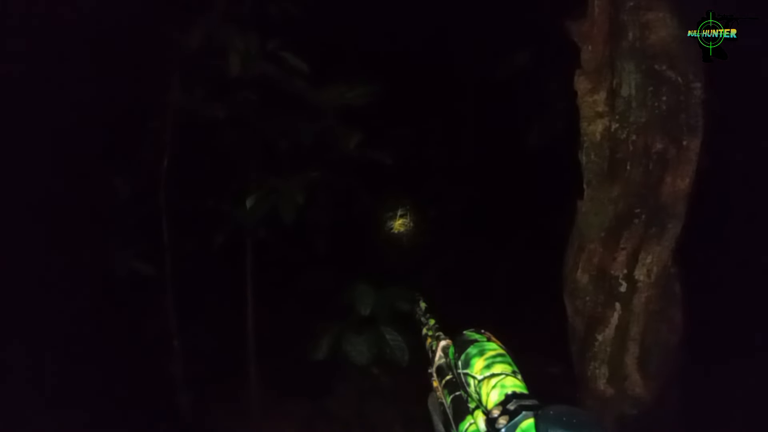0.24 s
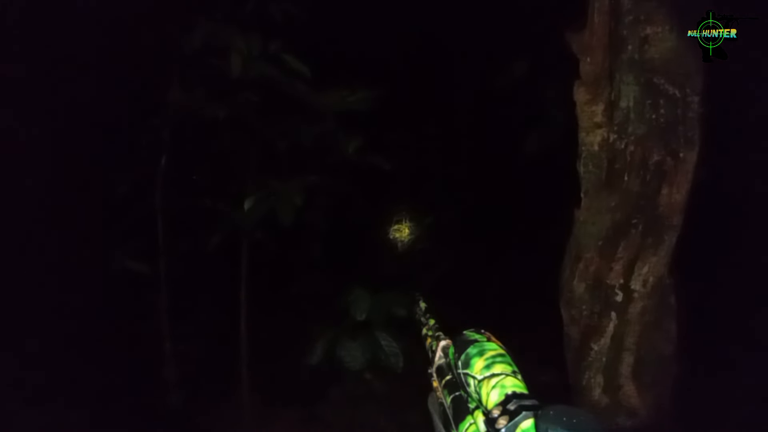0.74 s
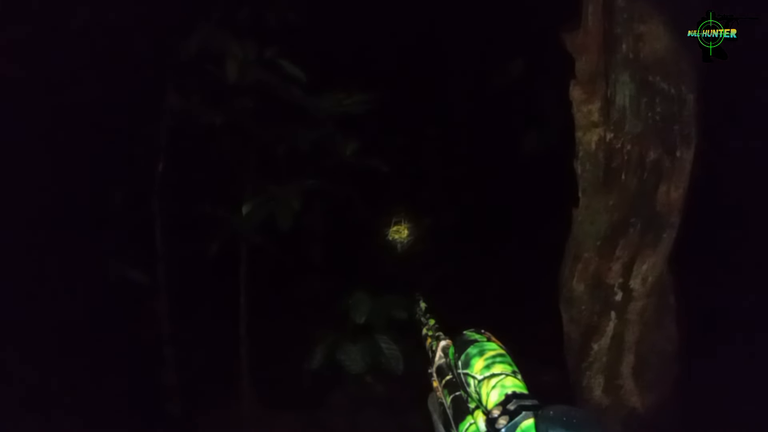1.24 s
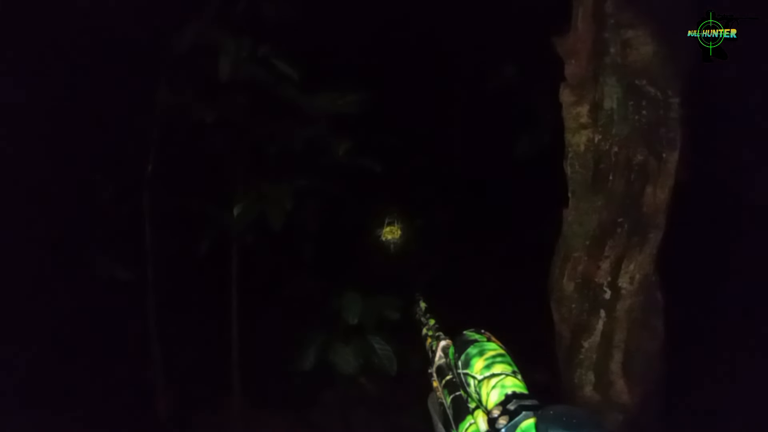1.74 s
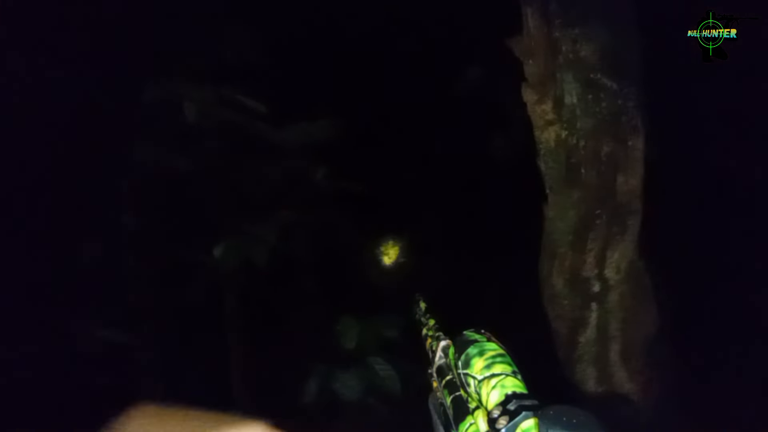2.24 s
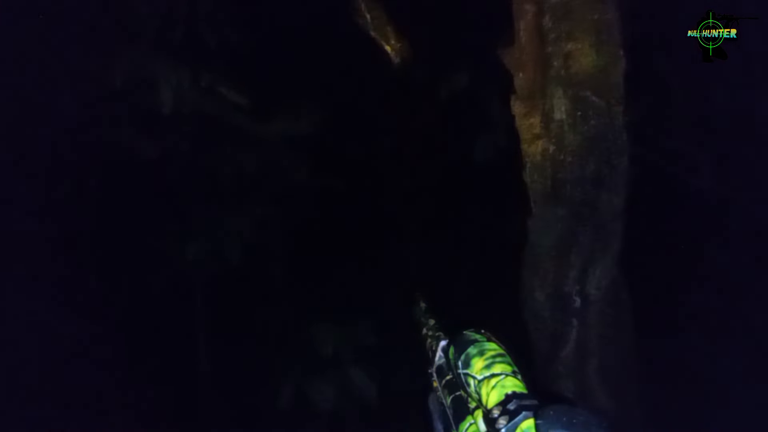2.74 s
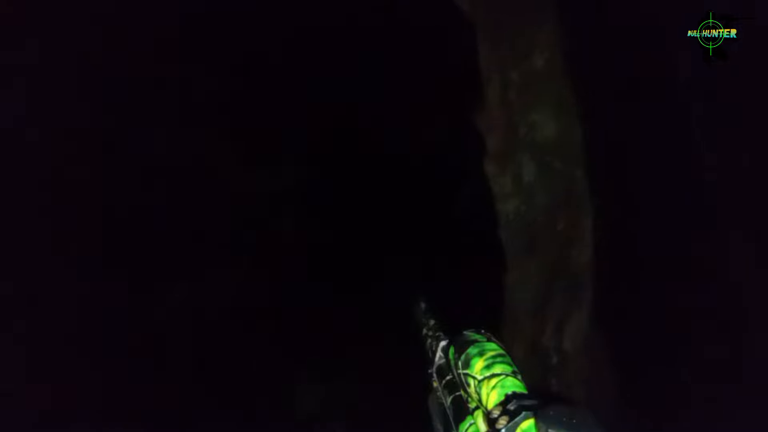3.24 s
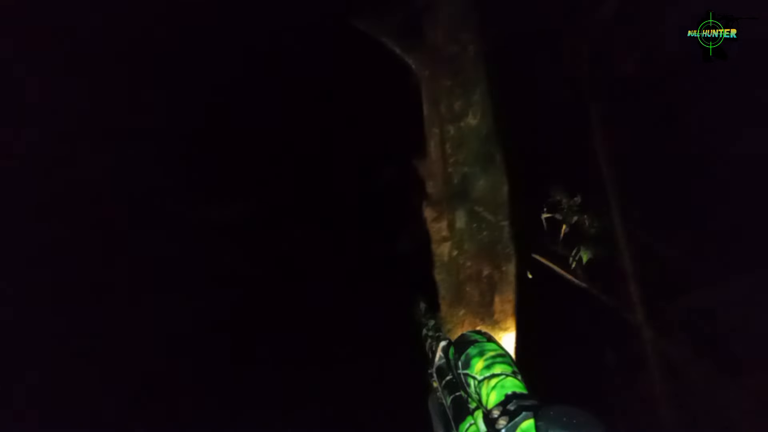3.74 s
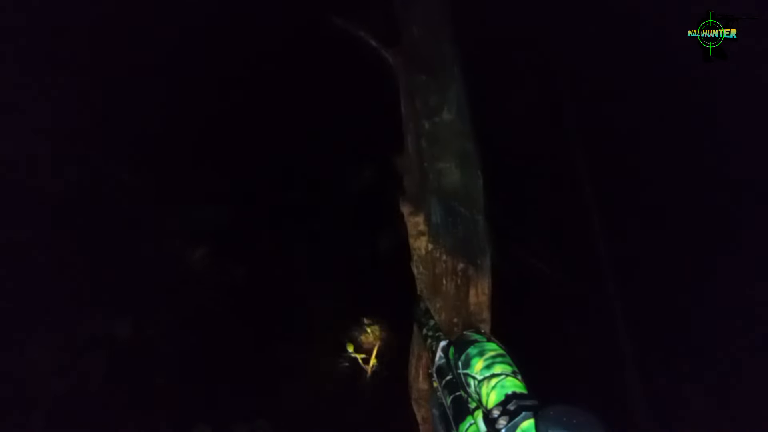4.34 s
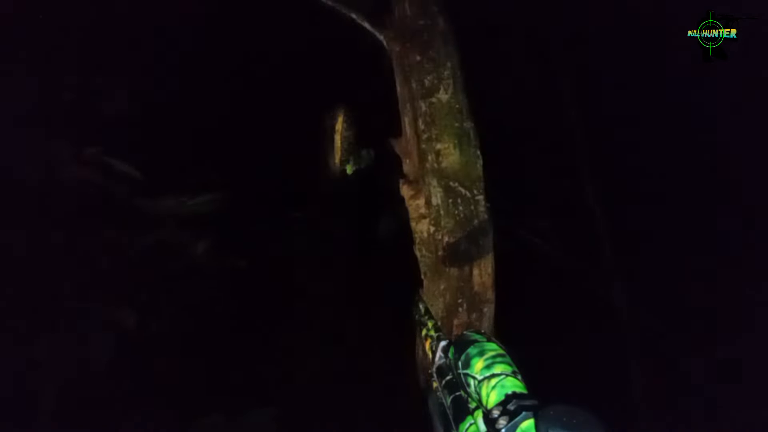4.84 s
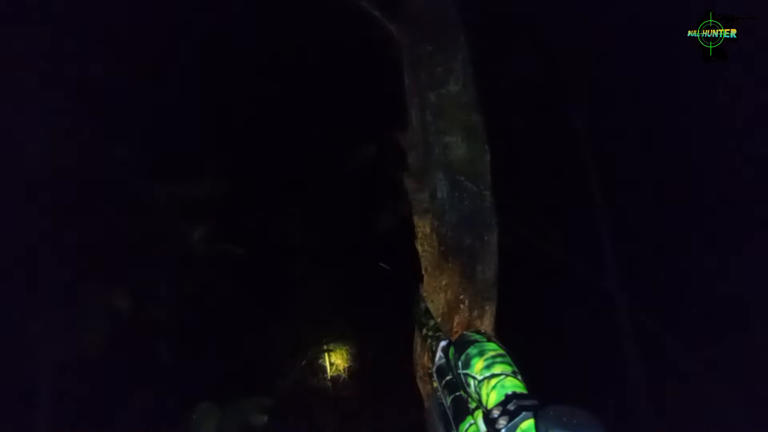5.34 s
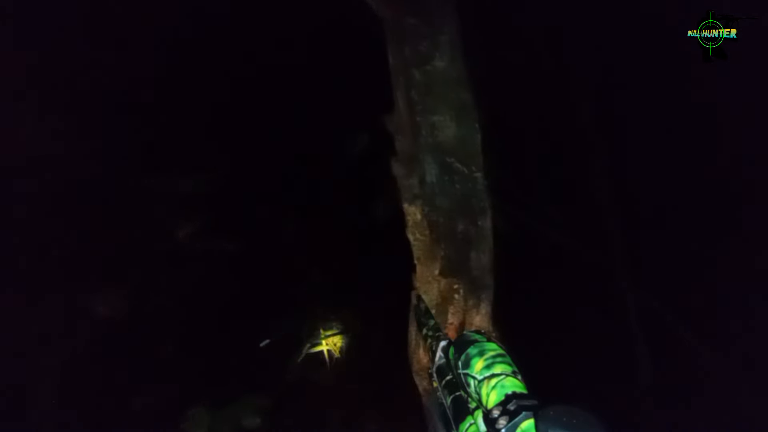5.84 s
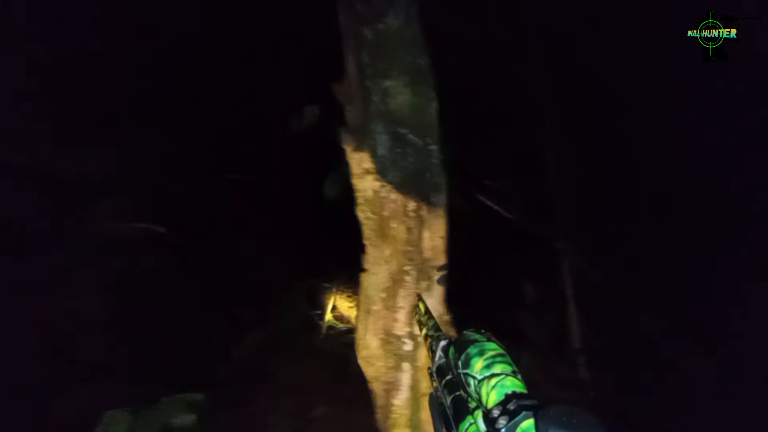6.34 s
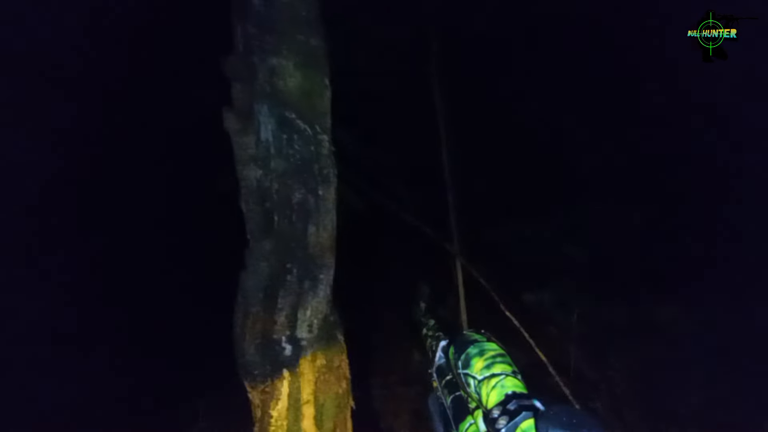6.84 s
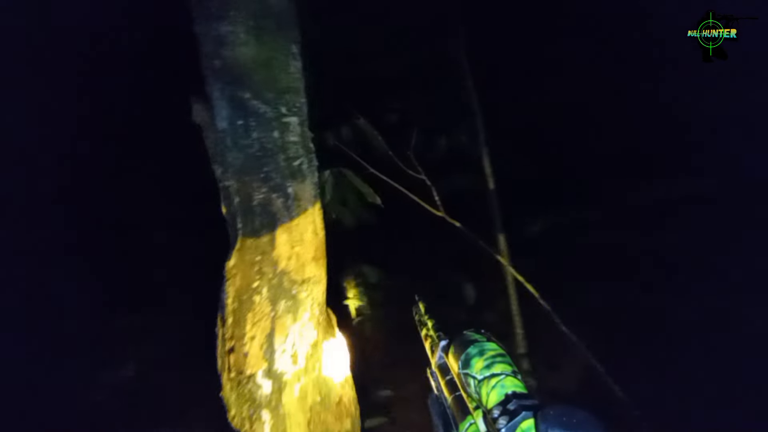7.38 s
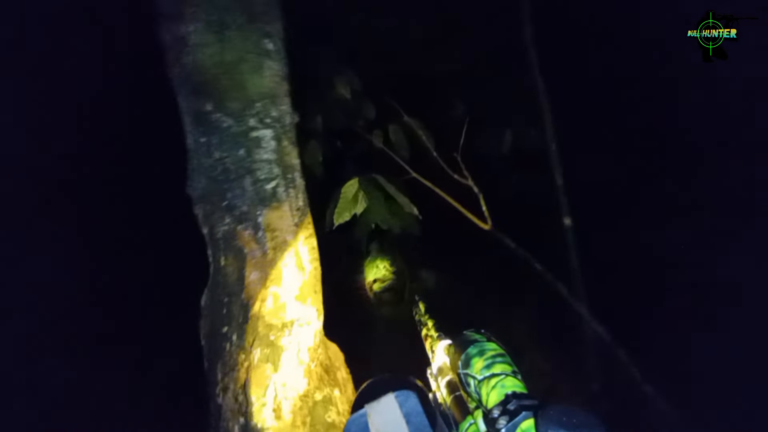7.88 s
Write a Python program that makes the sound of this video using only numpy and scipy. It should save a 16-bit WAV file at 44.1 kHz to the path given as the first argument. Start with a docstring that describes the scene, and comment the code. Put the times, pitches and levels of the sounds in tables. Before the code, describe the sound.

High cricket trills and rasping katydids fill a tropical forest at night while someone nearby creeps over leaf litter, twigs cracking and sharp clicks snapping.

```python
"""Tropical forest at night

Crickets trill at two pitches, a katydid rasps about four times a second above them and a small frog calls
far off: all are wing or voice tones smeared by echoes from the trees. Someone creeps through the leaf litter
with gear in hand: soft knocks, crackling twigs and sharp snaps, made of short noise bursts and dying tones.
Cloth rubs, a low rumble, a brief hum and a faint hush of air are filtered noise.
"""
import sys
import numpy as np
from scipy import signal
from scipy.fft import rfft, irfft
from scipy.io import wavfile
from scipy.ndimage import uniform_filter1d

SR = 44100
rng = np.random.default_rng(int(sys.argv[2]) if len(sys.argv) > 2 else 0)


def int16_out(signal):
    """Quantize to a 16-bit WAV file."""
    q = np.round(np.clip(np.atleast_2d(signal).T, -1, 1) * 32767)
    wavfile.write(sys.argv[1], SR, q.astype(np.int16))


N = 357651
T = np.arange(N) / SR  # time in seconds

# Dry leaves crushed under a slow tread.
# Each row: time of the peak in seconds, half length in seconds, relative level in dB.
LEAF_CRUNCHES = [(.095, 0.02, -65.5), (.72, 0.019, -60.5), (1.175, 0.023, -56), (1.28, 0.093, -61.5),
                 (1.365, 0.028, -58), (1.455, 0.013, -58), (1.643, 0.0096, -52.5), (1.83, 0.066, -66.5),
                 (2.16, 0.084, -59), (2.29, 0.035, -70), (3.3, 0.019, -56.5), (5.22, 0.081, -61),
                 (6.39, 0.085, -64.5), (7.4, 0.25, -63.5), (7.87, 0.017, -56.5)]


def undb(db):
    """Turn decibels into gain."""
    return 10 ** (np.asarray(db) / 20)


def unit(x):
    """Scale each channel to an average strength (rms) of 1."""
    return x / np.sqrt(np.mean(x ** 2, axis=-1, keepdims=True) + 1e-20)


def walk(rate):
    """Smooth random wandering with a spread near 1, changing about rate times a second."""
    return 1.2 * np.interp(T * rate, np.arange(4096), rng.standard_normal(4096))


def pair(size, alike):
    """Left and right white noise; alike (0 to 1) is the share they have in common."""
    alike = np.clip(alike, 0, 1)
    shared = np.sqrt(alike) * rng.standard_normal(size)
    return shared + np.sqrt(1 - alike) * rng.standard_normal((2, size))


def colour(x, points):
    """Filter a sound by a spectrum given as (Hz, dB) points."""
    hz, db = np.transpose(points)
    f = np.fft.rfftfreq(x.shape[-1], 1 / SR)
    gain = undb(np.interp(np.log(f + 1), np.log(hz), db))
    return irfft(rfft(x) * gain, x.shape[-1])


def ring(x, hz, q):
    """A single resonance; a higher q rings longer and purer."""
    return signal.lfilter(*signal.iirpeak(min(hz, .45 * SR), max(q, .6), fs=SR), x)


def add(out, s, x, pan_db=0):
    """Mix a sound in at time s; pan_db is left minus right."""
    i = max(int(s * SR), 0)
    sides = undb(np.array([[pan_db], [-pan_db]]) / 2)
    out[:, i:i + x.shape[-1]] += (x * sides)[:, :N - i]


def forest(x, t60, alike):
    """Countless faint reflections from trunks and leaves, falling 60 dB in t60 seconds, at unit gain."""
    t = T[:SR]
    echo = unit(pair(SR, alike) * undb(-60 * t / t60)) / np.sqrt(SR)
    return signal.fftconvolve(np.atleast_2d(x), echo, axes=1)[:, :N]


def wings(hz, spread_hz, strokes, count=3, rough=.45):
    """A few wing voices: each stroke is a short, slightly rough tone that sags as the stroke slows."""
    out = 0
    for place in np.linspace(-1, 1, count):
        stroke_rate = strokes * (1 + .06 * place + .012 * walk(5))
        stroke = (rng.random() + np.cumsum(stroke_rate) / SR) % 1  # 0 to 1 through each stroke
        pitch = hz + spread_hz * (.7 * place + rough * walk(90) + 2.0 * (.5 - stroke))
        tone = np.sin(2 * np.pi * np.cumsum(pitch) / SR)
        out = out + np.sin(np.pi * stroke) ** 2 * tone
    return unit(out)


def trill(hz, from_middle, length, strokes):
    """One cricket's trill swells, holds and fades; its even strokes split the tone into fine strands."""
    effort = np.exp(-np.abs(2 * from_middle / length) ** 3.3)  # a higher power rises and falls more steeply
    return wings(hz + 9 * walk(3), spread_hz=62, strokes=strokes, count=3, rough=0.1099) * effort


def trillers():
    """Crickets near 4.4 kHz trill in turn, high and low, over a distant blend that fills the pauses."""
    # Near trills. Each row: time of the middle in seconds, length in seconds, pitch in Hz, relative level in dB.
    trill_rows = [(.25, 0.46, 4180, -67), (.42, 0.84, 4540, -55), (0.62, 0.36, 4393, -51),
                  (1.07, 0.55, 4623, -60.5), (1.353, 0.42, 4260, -65), (1.392, 0.35, 4468, -48.5),
                  (2.105, 0.63, 4454, -52.5), (2.598, 0.39, 4210, -68.5), (2.93, 0.48, 4470, -52.5),
                  (3.393, 0.61, 4492, -52.5), (3.52, 0.41, 4254, -65), (3.95, 0.6, 4420, -54.5),
                  (4.184, 0.55, 4577, -55), (4.66, 0.46, 4485, -56), (4.67, .36, 4270, -61),
                  (5.263, 0.54, 4477, -51.5), (5.673, 0.31, 4437, -53), (5.74, 0.2, 4200, -63),
                  (6.285, 0.62, 4481, -51.5), (6.62, 0.27, 4220, -65), (6.918, 0.59, 4514, -53),
                  (7.363, 0.41, 4388, -54), (7.49, 0.27, 4275, -59), (7.922, 0.36, 4515, -52)]
    # Distant trillers. Each row: pitch in Hz, level in dB.
    far_rows = [(4270, -74), (4420, -60.5), (4600, -64)]
    strokes = 62  # wing strokes per second
    near = sum(trill(hz, T - s, length, strokes) * undb(db) for s, length, hz, db in trill_rows)
    far = sum(wings(hz, spread_hz=70, strokes=strokes, rough=0.3) * undb(db) for hz, db in far_rows)
    among_trees = unit(forest(near, t60=0.39, alike=0)) * np.std(near)
    distant = unit(forest(far, t60=0.31, alike=0)) * np.std(far)
    return undb(-7) * near + undb(-1.0) * among_trees + distant


def beat(first, every):
    """Seconds from the nearest tick of an even beat."""
    return (T - first + every / 2) % every - every / 2


def high_crickets():
    """Two voices throb near 8 kHz, about nine and seven times a second; a higher one answers now and then."""
    # Even beats, in and out of step. Each row: chirps per second, time of the first chirp in seconds.
    chirp_beats = [(8.99, .051), (6.985, .005)]
    # The two voices. Each row: pitch in Hz, chirp length in seconds, relative level in dB.
    chirp_voices = [(7910, 0.056, -50.5), (7854, 0.06, -52.5)]
    # The faster voice waxes and wanes. Each row: time in seconds, level change in dB.
    chirp_swell = [(0, -5), (1.6, -4.5), (2.3, 0), (3.4, -4.5), (4.5, 1), (5.3, -3), (6.4, -2),
                   (8.11, -5.5)]
    # Short trills of the higher cricket. Each row: start in seconds, length in seconds, level in dB.
    answers = [(1.0, 0.18, -64.5), (2.52, 0.16, -72), (5.664, 0.088, -67), (7.134, 0.12, -62),
               (7.614, 0.15, -58)]
    lead_s = 0.0068  # the wings move this long before the sound peaks among the trees
    song = 0
    swells = np.interp(T, *np.transpose(chirp_swell)), 0
    for (rate, first), (hz, length, db), swell_db in zip(chirp_beats, chirp_voices, swells):
        throb = np.exp(-(2 * beat(first - lead_s, 1 / rate) / length) ** 2)
        voice = wings(hz, spread_hz=62, strokes=75, count=4, rough=1.1)
        song = song + voice * throb * undb(db + swell_db)
    sides = undb(np.array([[-1.8], [.9]]))  # a little to the right
    near = unit(forest(song, t60=0.11, alike=0.07)) * np.std(song) * sides
    reply = sum(undb(db) * np.exp(-(2 * (T - s) / length - 1) ** 4) for s, length, db in answers)
    return near + forest(wings(8340, spread_hz=160, strokes=95) * reply, t60=.2, alike=0.37)


def katydid():
    """Each rasp starts with a broad, lower scrape, narrows to its upper tone and dies away."""
    # Even runs with a short rest between them.
    # Each row: first rasp in seconds, end of the run in seconds, seconds between rasps.
    rasp_runs = [(-.05, 2.5, .241), (2.71, 3.8, .243), (3.97, 4.8, .241), (4.96, 7.4, .257),
                 (7.669, 8.1, .28)]
    starts = np.concatenate([np.arange(first, end, every) for first, end, every in rasp_runs])
    latest = np.maximum(np.searchsorted(starts, T) - 1, 0)
    age = np.maximum(T - starts[latest], 0)  # seconds since the rasp began
    effort = (1 - np.exp(-age / 0.013)) * np.exp(-(age / 0.17) ** 3)
    pitch = 10600 - 170.7 * np.exp(-age / 0.055)  # climbs to 10600 Hz
    tone = wings(pitch, spread_hz=190, strokes=130, count=4, rough=.7)
    # a lower wing resonance sounds early in each rasp
    scrape = wings(10280, spread_hz=210, strokes=200, rough=.6) * undb(-8) * np.exp(-(age / 0.12) ** 2)
    rasp = (tone + scrape) * effort * undb(-57 + 0.1 * walk(5.24))
    return unit(forest(rasp, t60=0.057, alike=0.22)) * np.std(rasp)


def steady_chorus():
    """Far insects that never pause blend into unbroken bands of wing tones."""
    # Each row: pitch in Hz, spread of pitch in Hz, wing strokes per second, middle level in dB.
    steady_rows = [(2327, 95, 66, -75), (4440, 210, 110, -68.5), (5046, 100, 92, -75),
                   (6615, 200, 110, -78), (6970, 60, 68, -78), (7926, 90, 58, -53.5),
                   (8030, 380, 140, -69.5), (8730, 230, 100, -82), (10610, 40, 91, -69),
                   (10500, 370, 130, -72)]
    out = 0
    for hz, spread, strokes, db in steady_rows:
        band = unit(forest(wings(hz, spread, strokes), t60=0.23, alike=0))
        out = out + band * undb(db + 0.61 * walk(3.3))
    return out


def frog():
    """Short rattling notes slide up to their pitch and linger between the trees."""
    # Distant notes. Each row: start in seconds, pitch in Hz, relative level in dB.
    frog_notes = [(.5, 2930, -80.5), (1.75, 2956, -76.5), (2.51, 2854, -74), (3.65, 2940, -76.5),
                  (4.85, 2840, -75.5), (5.54, 2927, -78.5), (6.96, 2940, -77.5), (7.82, 2865, -77.5)]
    out, t = np.zeros((2, N)), T[:SR // 3]
    for s, hz, db in frog_notes:
        rattle = 1 + 0.46 * np.sin(2 * np.pi * 62 * t)
        scoop = -15 * np.exp(-t / 0.027)  # starts 15 Hz low
        pitch = hz + scoop + 52 * walk(303)[:len(t)]
        note = rattle * np.sin(2 * np.pi * np.cumsum(pitch) / SR)
        add(out, s, note * (1 - np.exp(-t / 0.006)) * np.exp(-(t / 0.16) ** 4) * undb(db))
    close_trees = undb(8.5) * forest(out, t60=0.095, alike=0.27)
    deep_forest = undb(8.0) * forest(out, t60=1.04, alike=0)
    return undb(1.5) * out + close_trees + deep_forest


def burst(t60, alike):
    """A shower of tiny impacts that dies quickly, its spectrum flattened to even energy at all pitches."""
    fade = undb(-60 * T[:SR // 4] / max(t60, .002))
    spectrum = rfft(pair(SR // 4, alike) * fade)
    flat = irfft(spectrum / (np.abs(spectrum) + 1e-9), SR // 4)
    return flat * fade ** .25


def ping(hz):
    """One quickly dying tone of a broken stick, falling 60 dB in about 5 ms."""
    t = T[:SR // 4]
    return np.sin(2 * np.pi * hz * t) * (1 - np.exp(-t / 0.00022)) * undb(-60 * t / 0.0053)


def push(hz):
    """The brief heave of a soft contact: a cycle or two through a broad resonance."""
    cycles = T[:SR // 4] * hz
    return ring(np.sin(2 * np.pi * cycles) * np.exp(-(cycles / 1.54) ** 2), hz, q=0.56)


def strength(x, t60):
    """Scale a sound by its energy, as a burst dying over t60 seconds that starts near rms 1."""
    energy = np.mean(np.sum(x ** 2, axis=-1))
    return x / np.sqrt(energy * 2 * np.log(1000) / (max(t60, .002) * SR))


def snaps(out):
    """Sharp snaps: a coloured crack of noise plus two ringing tones of the stick."""
    # Each row: time in seconds, relative level in dB, tilt in dB per octave, decay in seconds,
    # left minus right in dB, lower ring in Hz, its level in dB, upper ring in Hz, its level in dB.
    snap_rows = [(0.06, -36, -6, 0.0078, -12.5, 2000, -14, 3420, -2),
                 (0.9182, -12.5, 5, 0.0067, -6.5, 8200, -5, 10020, -1),
                 (0.9196, -20, -1, 0.0047, 5, 3640, -8, 9340, -9),
                 (0.921, -16.5, 1, 0.005, 1, 6800, -9, 9700, -9),
                 (1.8507, -40.5, -4, .008, -6, 3480, -3, 5600, -10),
                 (2.801, -44, 2, 0.0069, 4, 9200, -12, 11800, -4),
                 (3.012, -38, 8, 0.007, 4, 9000, -8, 11400, -8),
                 (3.4913, -27.5, 3.5, 0.011, 4.5, 1840, -18.5, 5100, -15),
                 (5.159, -42, 14, .005, -4, 10600, -8, 12600, -10),
                 (5.2559, -38.5, 1, 0.029, -2, 1900, -9.5, 5760, -4.5),
                 (6.0539, -32, -1, 0.017, 6, 1530, -20, 4970, -5),
                 (6.175, -25, 0, 0.01, 5, 3670, 1, 7100, -3),
                 (6.362, -43, 8, 0.0056, -4, 10300, -5, 12400, -12),
                 (7.2843, -42, 5, 0.015, -12, 3600, -11, 9800, -4)]
    # Colour of a snap before tilting. Each row: frequency in Hz, level in dB.
    snap_colour = [(150, -30), (450, -8), (1000, -38), (1550, -12), (2500, -0.5), (3100, -1), (3700, 0.5),
                   (5000, 2), (7000, -5), (8000, 2.5), (10400, 3), (12000, -4.5), (16000, -16)]
    lead = 128  # samples of room before a snap for its attack to form
    for s, db, tilt, t60, pan, low_hz, low_db, high_hz, high_db in snap_rows:
        tilted = [(f, level + tilt * np.log2(f)) for f, level in snap_colour]
        crack = strength(colour(np.roll(burst(t60, alike=0.33), lead, axis=1), tilted), t60)
        low = strength(ping(low_hz), t60) * undb(low_db)
        high = strength(ping(high_hz), t60) * undb(high_db)
        snap = crack + np.roll(low + high, lead)
        add(out, s - lead / SR, snap[:, :SR // 5] * undb(db), pan)


def twigs(out):
    """Twigs crack underfoot: one noise burst rings the wood and a broader band of splinters."""
    # Each row: time in seconds, relative level in dB, ring in Hz, splinters against wood in dB,
    # decay in seconds, left minus right in dB.
    twig_rows = [(.05, -53, 1800, 3, .025, -2), (0.059, -40.5, 1920, -18, 0.04, 9),
                 (.061, -41, 1145, -15, 0.017, -4), (.1, -51.5, 1210, -6, 0.027, -1),
                 (.664, -56, 880, -3, 0.021, -3), (0.73, -50.5, 2950, -10, 0.022, 2),
                 (1.127, -60, 2900, 5, 0.058, -1), (1.151, -42, 1850, -5, 0.046, -1),
                 (1.152, -40.5, 1040, -20, 0.024, -0.5), (1.167, -51.5, 3000, -8, 0.04, -3),
                 (1.228, -58.5, 1950, 1.5, 0.045, -3), (1.432, -56, 3250, -2, 0.017, -7),
                 (1.483, -35.5, 3050, -22, 0.013, -2), (1.8026, -42, 3400, -27, 0.0095, 8),
                 (1.811, -40.5, 3680, -9, 0.013, 5), (1.8496, -42, 1280, -9, 0.02, 0),
                 (1.852, -45, 3400, -10, 0.014, -8), (2.0585, -56, 1340, -13, 0.02, 3),
                 (2.1253, -53.5, 1380, -13, 0.036, 1), (2.158, -61, 1300, -12, .035, 0),
                 (2.19, -55, 1520, -9, .025, 3), (2.222, -57, 1450, -8, 0.024, -1),
                 (2.335, -44.5, 1380, -5, 0.0091, 1), (3.207, -53.5, 1560, -17, 0.017, 0),
                 (3.331, -53, 1350, 2.5, 0.026, 7), (3.342, -57, 1350, 10, 0.0069, 2),
                 (3.788, -61, 1290, 7.5, 0.033, -3), (3.848, -45.5, 1280, -14, 0.025, 4),
                 (3.903, -46, 3760, -25, 0.0063, 13), (5.212, -52, 1590, -10, 0.023, 1),
                 (5.3663, -61, 2250, 6, 0.021, -2), (5.462, -59, 1030, 2, .015, 0),
                 (5.536, -52, 980, 3, 0.015, 0), (6.055, -48, 1430, -14, 0.011, 4),
                 (6.176, -38, 1950, -17, 0.0066, 3), (6.886, -53, 3500, -9, 0.078, 4),
                 (7.232, -47, 780, -18, 0.016, 12), (7.3404, -54.5, 2620, 9, 0.014, -2),
                 (7.5713, -50.5, 855, -2, 0.027, -1), (7.745, -60, 1600, 4, 0.007, -2),
                 (7.8536, -49, 2070, -5, 0.046, 2), (7.9774, -68, 2800, 18.5, 0.018, -1)]
    for s, db, hz, splinter_db, t60, pan in twig_rows:
        fibres = burst(t60, alike=0.33)
        wood = strength(ring(ring(fibres, hz, q=5.3), hz, q=0.54), t60)
        splinters = strength(ring(ring(fibres, 2600, q=0.37), 1800, q=0.48), t60)
        add(out, s, (wood + undb(splinter_db) * splinters) * undb(db), pan)


def knocks(out):
    """Soft footfalls and bumps: one short push together with a loose, noisy shudder."""
    # Each row: time in seconds, relative level in dB, pitch in Hz, decay in seconds, left minus right in dB.
    knock_rows = [(0.062, -47, 241, 0.035, -10), (0.067, -51.5, 523, 0.09, 10),
                  (.919, -35.5, 570, 0.0076, 1), (.919, -31, 954, 0.01, -1), (1.127, -42, 140, 0.078, -15),
                  (1.128, -45.5, 380, .03, -1), (1.149, -47.5, 300, 0.17, -7), (2.113, -54, 159, 0.23, -21),
                  (2.145, -48.5, 107, 0.12, 17), (2.28, -40, 450, 0.015, 8), (7.234, -34, 415, 0.023, 5),
                  (7.235, -47, 222, 0.027, 2), (7.571, -38, 506, 0.02, 3), (7.593, -50, 754, 0.015, 5),
                  (7.87, -46, 174, 0.096, -13)]
    for s, db, hz, t60, pan in knock_rows:
        thud = ring(ring(burst(t60, alike=0.64), hz, q=2.35), hz, q=0.47)
        heave = strength(push(hz), t60) * undb(-5.5)
        shudder = strength(thud, t60) * undb(-3)
        add(out, s, (heave + shudder) * undb(db), pan)


def steps():
    """Snaps, cracking twigs and soft knocks, with the forest's faint answer."""
    out = np.zeros((2, N))
    snaps(out)
    twigs(out)
    knocks(out)
    late = np.roll(out, int(0.0065 * SR), axis=1)  # the first reflection comes from the ground
    ground = undb(-15) * forest(late, t60=0.021, alike=0.028)
    trees = undb(-21.5) * forest(late, t60=0.21, alike=0)
    return out + ground + trees


def pressure(table, edge=2):
    """Swells from rows of peak time, half length and dB; a lower edge gives longer skirts."""
    power = sum(undb(2 * db) * np.exp(-2 * np.abs((T - s) / width) ** edge) for s, width, db in table)
    return power ** .5


def grains(rate, spread_db, t60):
    """Tiny fractures at random times; a wider spread makes many faint and a few strong."""
    sizes = undb(spread_db * np.minimum(rng.exponential(size=N), 3.5))
    return unit(forest((rng.random(N) < rate / SR) * sizes, t60, alike=0.39))


def swishes():
    """Leaves and cloth brush past: a swell of hiss full of tiny catches."""
    # Each row: time of the peak in seconds, half length in seconds, relative level in dB.
    swish_rows = [(1.225, 0.21, -73), (1.8, 0.08, -71), (2.134, 0.13, -65.5), (2.78, 0.094, -63),
                  (2.874, 0.073, -51.5), (2.995, 0.18, -56), (4.1, 0.065, -65.5), (4.37, 0.075, -72),
                  (5.175, 0.039, -54.5), (5.275, 0.068, -57), (5.42, 0.3, -63), (5.68, 0.074, -63),
                  (6.383, 0.11, -63), (7.345, 0.1, -58.5), (7.522, 0.13, -59), (7.93, 0.18, -70)]
    friction = pair(N, 0.079) + grains(rate=340, spread_db=6, t60=0.0017)
    hiss = colour(friction, [(300, -33), (800, -9.5), (2000, -2.5), (4000, 3.0), (6000, 1.5),
                             (9000, 8.5), (12500, 4.0), (16000, -8)])
    return unit(hiss) * pressure(swish_rows, edge=1.85) * undb(1.35 * walk(40))


def litter():
    """Leaf litter crackles and scrapes while weight comes onto it."""
    fractures = grains(rate=700, spread_db=6, t60=0.019) + undb(-8) * pair(N, 0.38)
    crackle = colour(fractures, [(40, -17), (150, -0.5), (500, 7.5), (1300, -3.0), (2200, 0),
                                 (3500, -6.0), (6000, -16), (10000, -2), (16000, -37)])
    return unit(crackle) * pressure(LEAF_CRUNCHES)


def stray_ticks():
    """Around each tread, disturbed leaves and small twigs settle with faint scattered ticks."""
    ticks = grains(rate=90, spread_db=0.0, t60=0.01)  # 90 per second, all equally strong
    stirred = uniform_filter1d(pressure(LEAF_CRUNCHES), int(0.31 * SR))  # the tread spread over 0.31 s
    dry_ticks = colour(ticks, [(200, -11), (800, -14.0), (1400, -14.0), (3500, -7), (6000, 10), (16000, -32)])
    return unit(dry_ticks) * stirred * undb(-13)


def nearby():
    """Sounds of the walker reach the left port of the microphone 0.2 ms before the right."""
    left, right = steps() + swishes() + litter() + stray_ticks()
    return np.array([left, np.roll(right, int(0.0002 * SR))])


def rustle():
    """Cloth rubs softly over a deep handling rumble, wide and almost independent on the two sides."""
    # Deep handling rumble. Each row: time in seconds, relative level in dB.
    rumble_levels = [(0.0, -65), (0.83, -68.5), (1.13, -64), (1.6, -75), (2.28, -63.5), (2.75, -81),
                     (3.25, -70), (6.84, -83), (8.11, -67.5)]
    # Clothes rub at each slow movement.
    # Each row: time of the peak in seconds, half length in seconds, relative level in dB.
    rub_rows = [(.42, 0.14, -63), (1.5, 0.42, -66), (2.2, 0.19, -66.5), (3.35, 0.63, -66),
                (4.62, 0.14, -65.5), (5.68, 0.36, -64), (6.38, 0.15, -63), (7.52, 0.3, -67.5)]
    handling = pair(N, 0.028) * np.array([[1], [-1]])  # the right side is turned upside down
    rumble = unit(colour(handling, [(30, -43), (70, -18), (105, 2), (140, 2.0), (220, -10.0),
                                    (600, -35.0), (2000, -68)]))
    cloth = unit(colour(pair(N, 0.58), [(80, -32), (200, -4.0), (280, 4.5), (380, -3.5), (530, -4.0),
                                        (720, -18.0), (1500, -26.0), (6000, -41.0)]))
    rubbing = np.hypot(pressure(rub_rows), undb(-71))  # never quite still
    rumble_db = np.interp(T, *np.transpose(rumble_levels)) + 3
    return rumble * undb(rumble_db) + cloth * rubbing * undb(1.98 * walk(13))


def hum():
    """A faint, low, wavering hum from resonated noise, a little to the right, that dies away early."""
    hz = 142
    tone = unit(ring(ring(pair(N, 0.68), hz, q=4.3), hz, q=2.5))
    sides_db = np.array([[-1.5], [1.5]])
    return tone * undb(-66 + sides_db) * np.exp(-(T / 1.45) ** 8)  # gone soon after 1.45 s


def air():
    """Still forest air: a faint, almost even hush of coloured noise under everything."""
    # Colour of the hush. Each row: frequency in Hz, relative level in dB per Hz.
    air_colour = [(25, -27), (60, -2), (110, 5), (300, -4.5), (600, -12.5), (1000, -17.5), (1800, -19),
                  (3500, -20.5), (5800, -24.5), (7500, -9.5), (9500, -12.5), (11500, -23.5), (13000, -31.5),
                  (16000, -33)]
    return unit(colour(pair(N, 0), air_colour)) * undb(-64.0 + 0.25 * walk(2.07))


def scene():
    """Insects all round, a frog far off, steps close by."""
    insects = trillers() + steady_chorus() + high_crickets() + katydid()
    return insects + frog() + nearby() + rustle() + hum() + air()


def record(dry):
    """The recorder cuts the very top, above 15.9 kHz, with a steep low-pass filter."""
    return signal.sosfilt(signal.ellip(8, .2, 70, 15900, fs=SR, output="sos"), dry)


dry = scene()
out = record(dry)
int16_out(out)
```